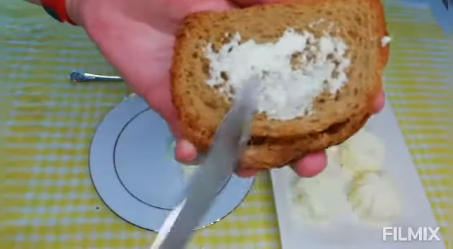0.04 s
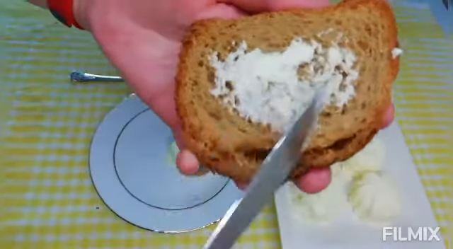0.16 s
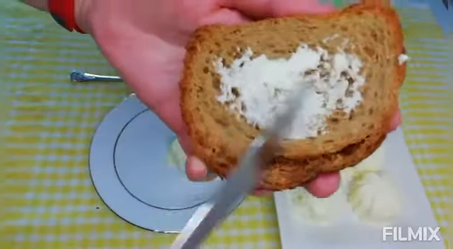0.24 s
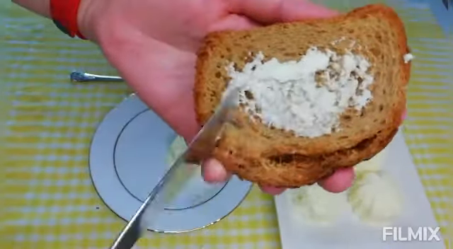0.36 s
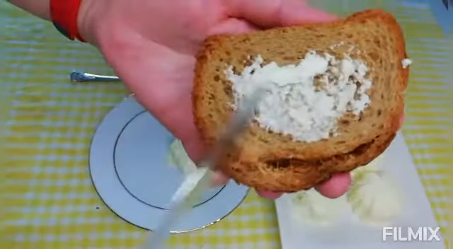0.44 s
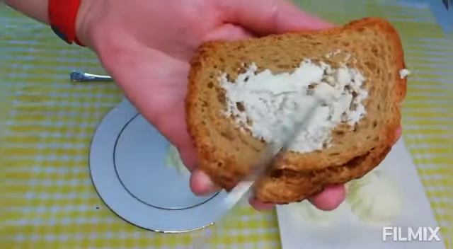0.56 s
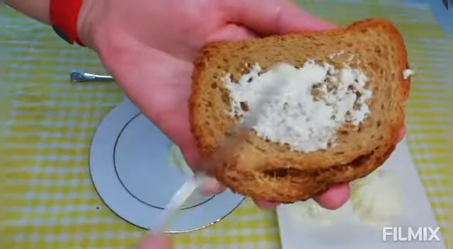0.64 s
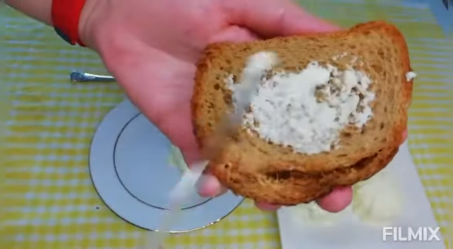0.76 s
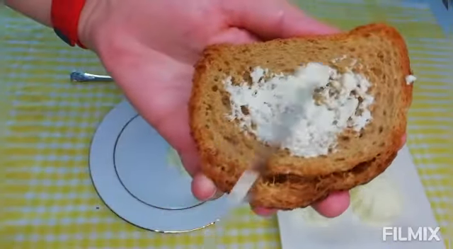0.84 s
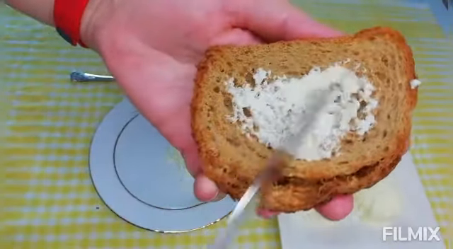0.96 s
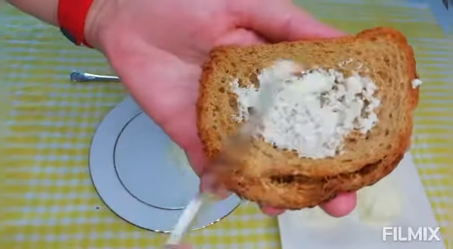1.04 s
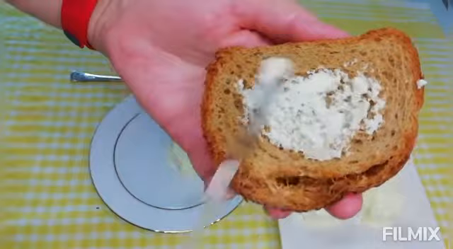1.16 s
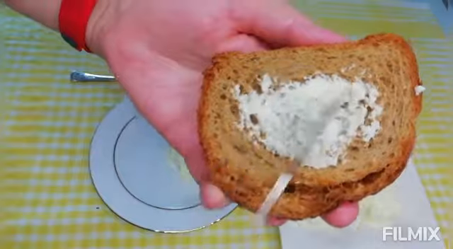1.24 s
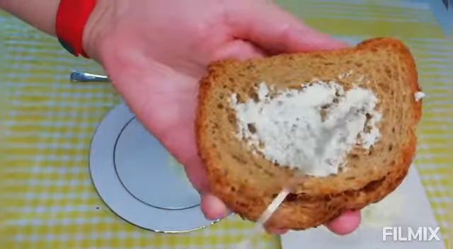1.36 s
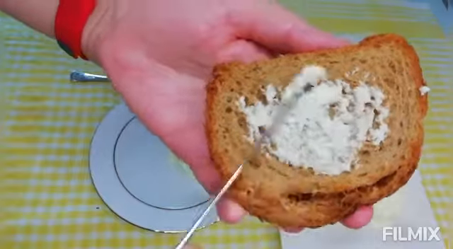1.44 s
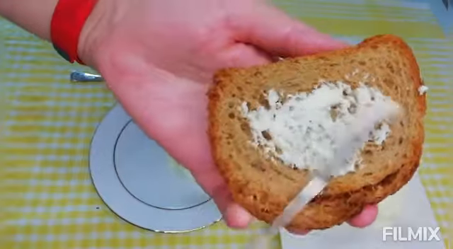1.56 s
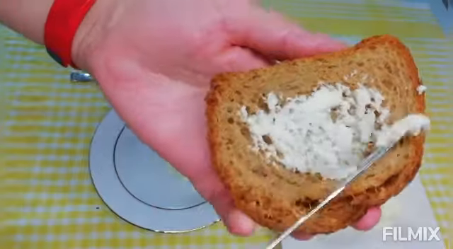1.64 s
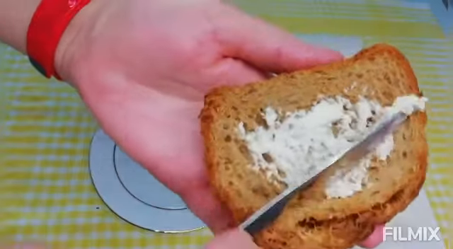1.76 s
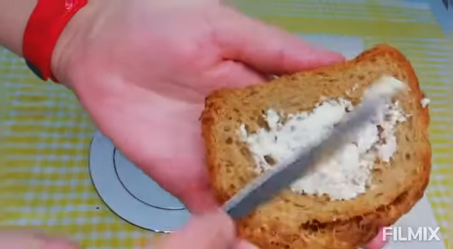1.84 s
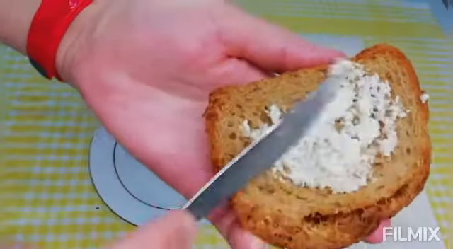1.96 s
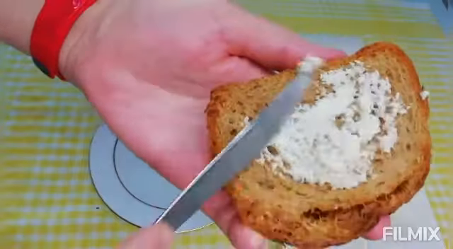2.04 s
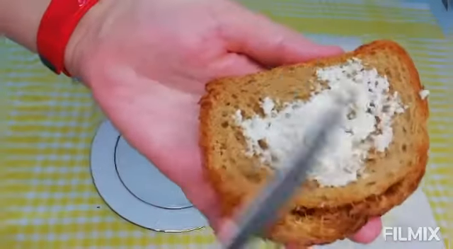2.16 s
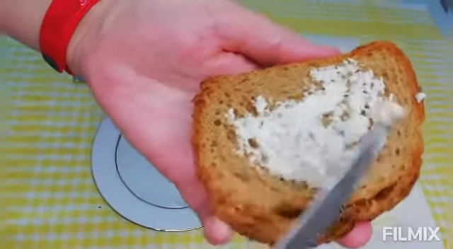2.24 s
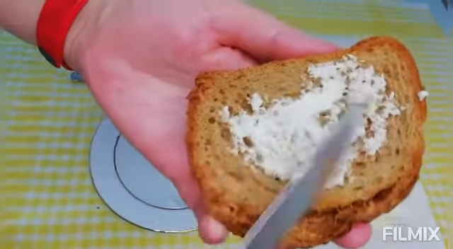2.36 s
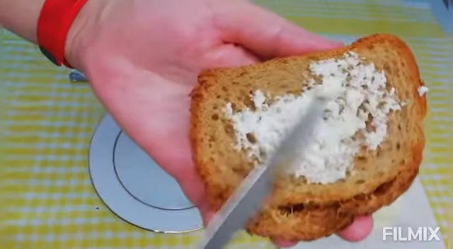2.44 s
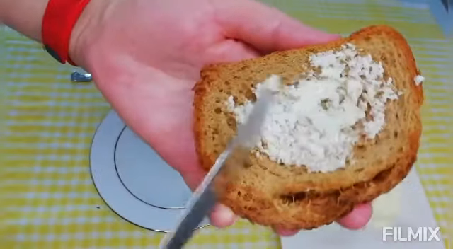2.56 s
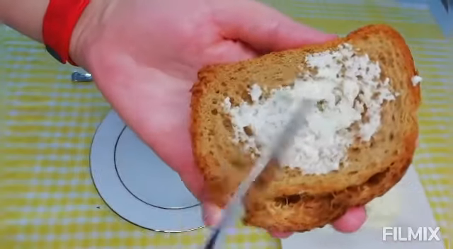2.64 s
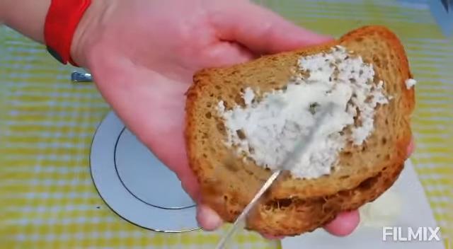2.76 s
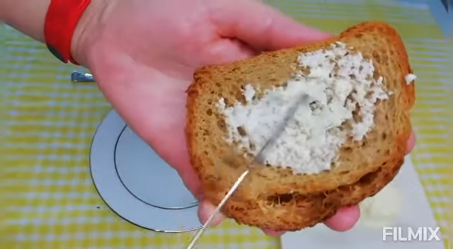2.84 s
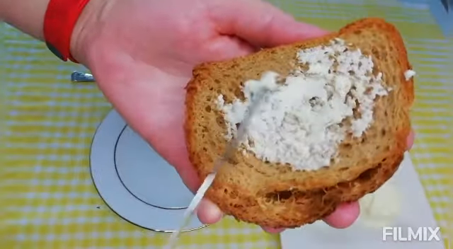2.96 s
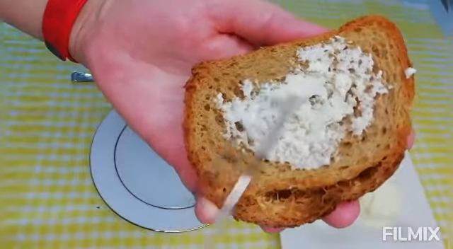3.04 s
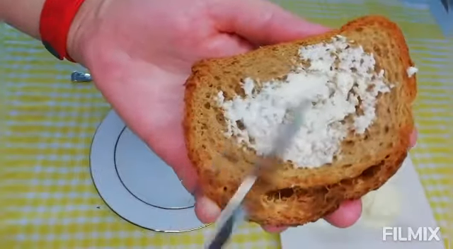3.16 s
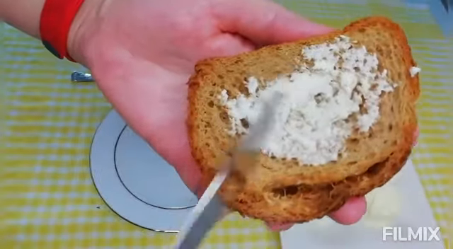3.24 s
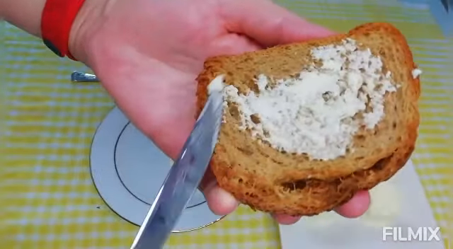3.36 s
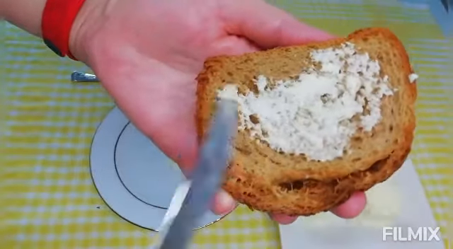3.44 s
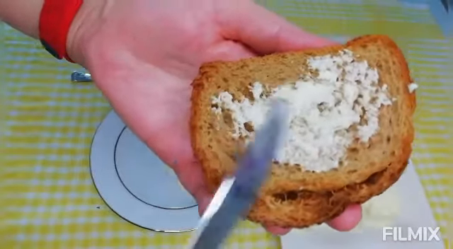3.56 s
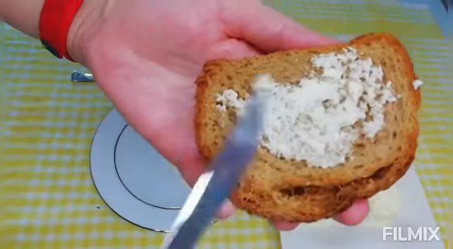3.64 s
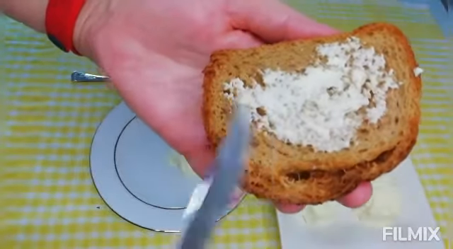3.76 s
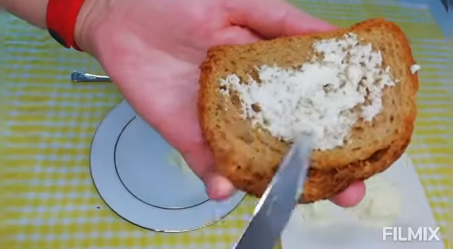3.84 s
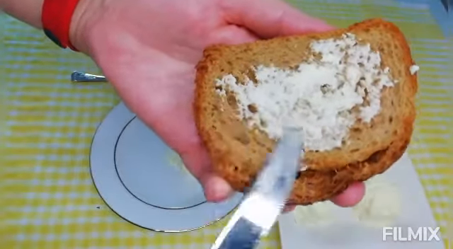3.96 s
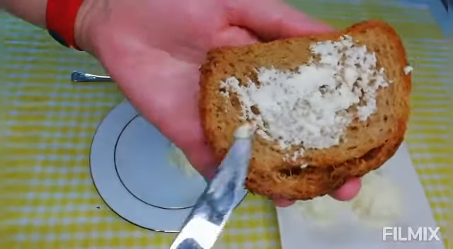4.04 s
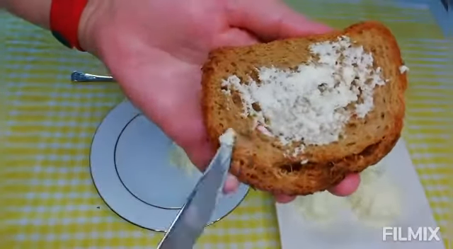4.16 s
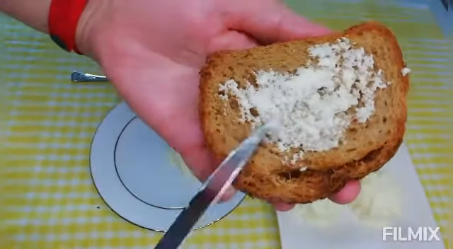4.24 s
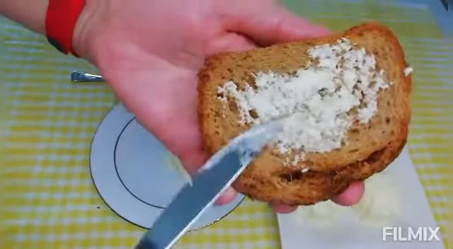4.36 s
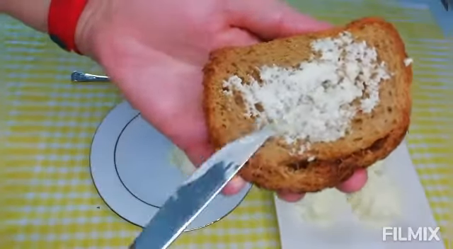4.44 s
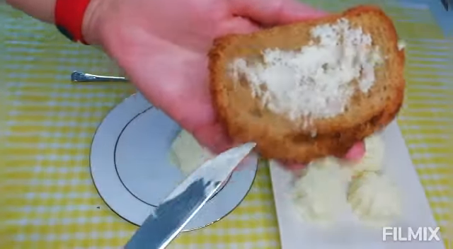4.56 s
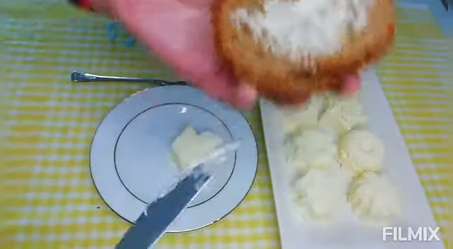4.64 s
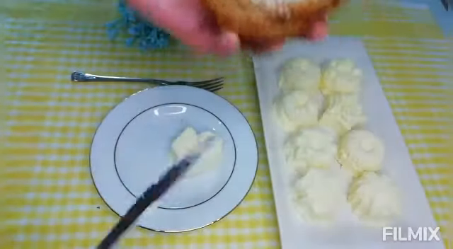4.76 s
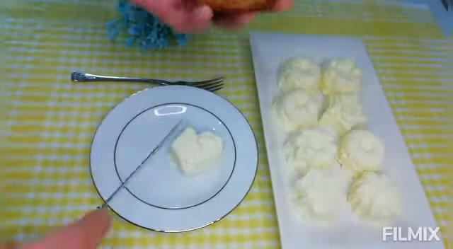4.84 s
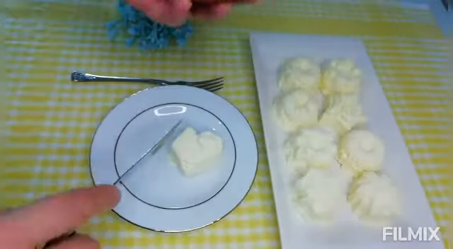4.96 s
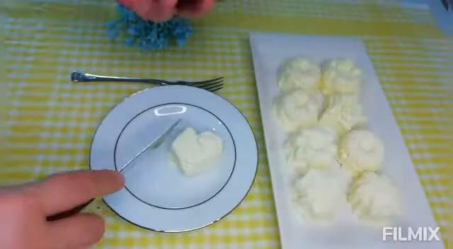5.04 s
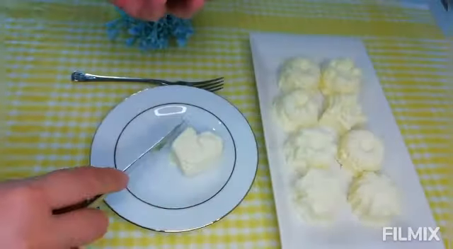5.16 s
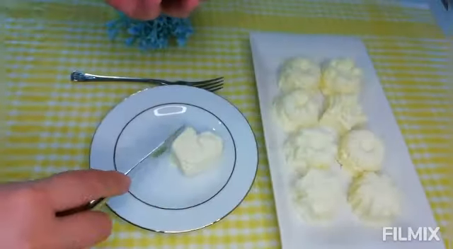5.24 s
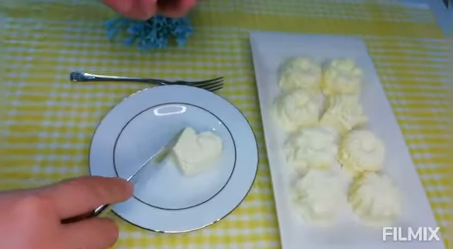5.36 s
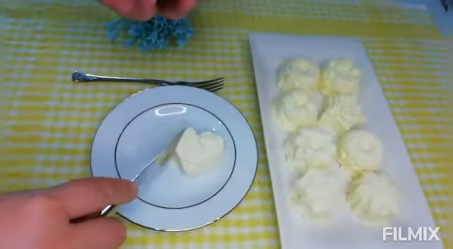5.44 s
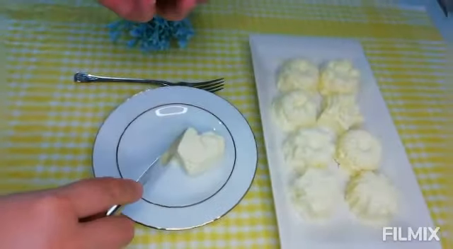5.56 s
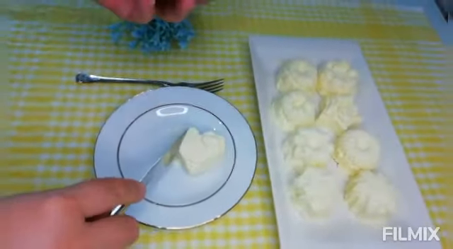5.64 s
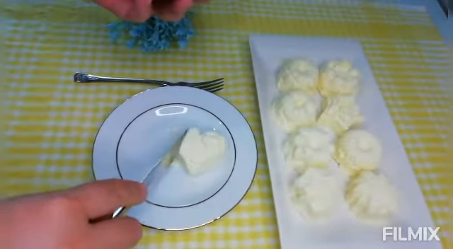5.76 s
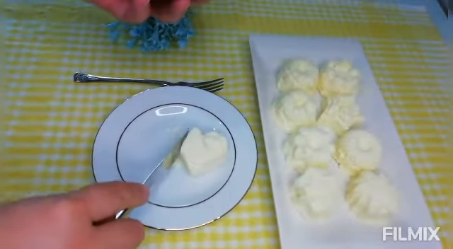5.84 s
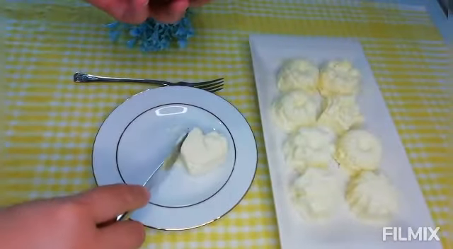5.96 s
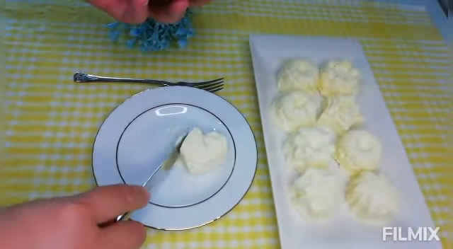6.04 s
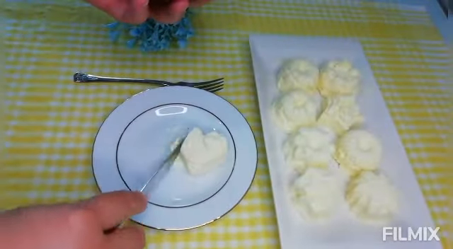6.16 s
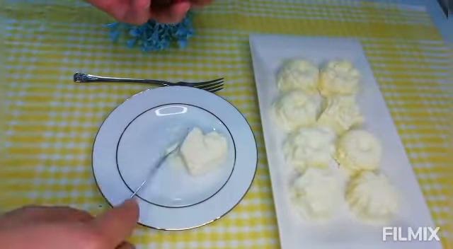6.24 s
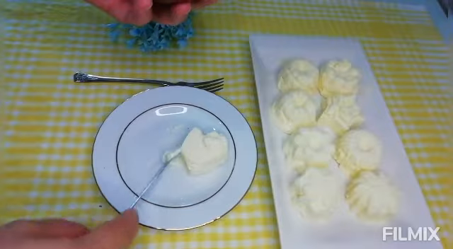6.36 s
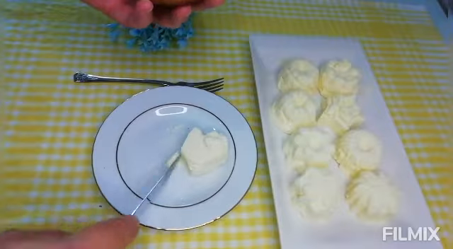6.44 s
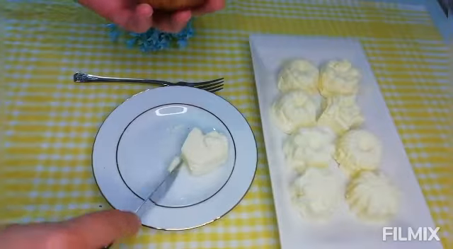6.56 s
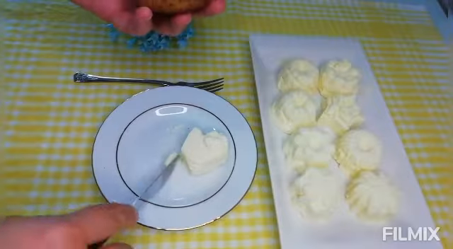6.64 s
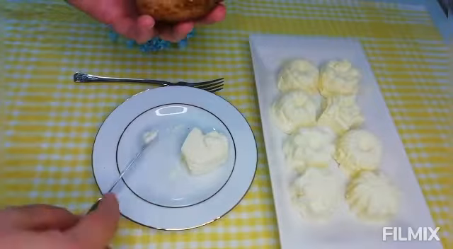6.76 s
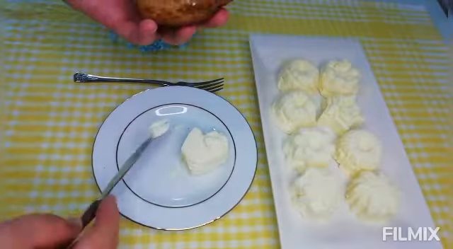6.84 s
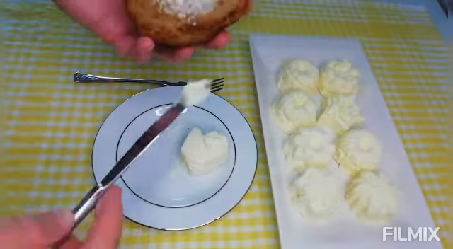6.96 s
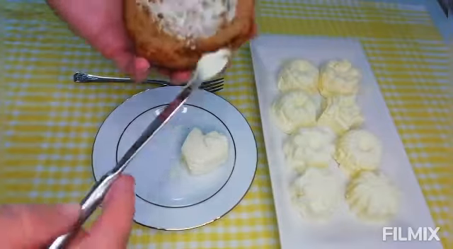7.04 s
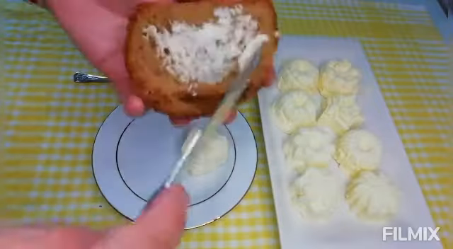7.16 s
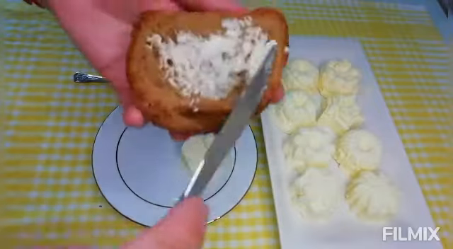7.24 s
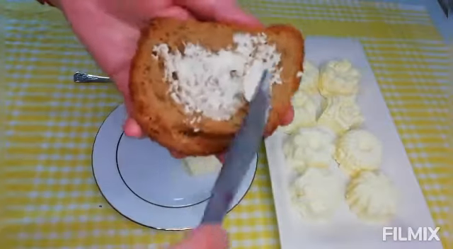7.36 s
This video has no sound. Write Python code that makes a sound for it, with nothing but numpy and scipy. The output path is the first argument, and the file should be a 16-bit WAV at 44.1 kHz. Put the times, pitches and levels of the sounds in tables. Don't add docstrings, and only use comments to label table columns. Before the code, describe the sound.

In a quiet home kitchen, two close microphones pick up a table knife spreading butter on dry toast held in the palm. From 0 to about 3.8 seconds come short, dry, crackling scrapes, mostly under a tenth of a second, often in quick pairs with brief gaps; dense crumb grains are mixed with single sharp snaps, strongest around 0.3 and 1.1 seconds. The slice adds a hollow, papery body and faint dull taps against the hand. Around 4.0 to 4.2 the blade skips on the hard rim with brittle cracks and a stronger palm knock; from 4.4 to 4.6 finer cracks end with a slight metallic ring. Then only low rumble, soft hiss and faint refrigerator hum remain. At 6.15 the blade gives one loud, bright, short-ringing click on the plate, followed by a tiny slide near 6.3 and another at 6.7 to 6.8. Quiet room tone closes it.

```python
import sys
import numpy as np
from scipy import signal
from scipy.fft import rfft, irfft, next_fast_len
from scipy.io import wavfile

SR = 44100
rng = np.random.default_rng(int(sys.argv[2]) if len(sys.argv) > 2 else 0)


def put_to_file(sound):
    columns = np.atleast_2d(sound).T
    safe = np.clip(columns, -1, 1)
    whole_steps = np.round(safe * 32767)
    wavfile.write(sys.argv[1], SR, whole_steps.astype(np.int16))


def field_ratio(decibels):
    return 10 ** (np.asarray(decibels, dtype=float) / 20)


N = 325899
SIZE = next_fast_len(N + SR)
BINS_HZ = np.maximum(np.arange(SIZE // 2 + 1) * SR / SIZE, 1)
CONTROL_STEP = 40

# (frequency [Hz], level [dB per Hz])
RUMBLE_COLOUR = [(15, -27), (30, -0.5), (50, 3), (75, -7), (100, -5.5), (160, -12), (200, -6.5),
                 (320, -17.5), (450, -13), (520, -25.5), (750, -20), (1500, -46)]
# (frequency [Hz], likeness [0 to 1])
RUMBLE_ALIKE = [(60, 1), (130, 1), (290, 0.48), (640, 0.01)]
# (frequency [Hz], left level [dB], right level [dB])
HISS_COLOUR = [(496, 2, 8.5), (1033, 12, 13), (1460, 4.5, 6), (2340, -1.5, 0), (3350, 2, 2), (4820, 1, 2),
               (6030, -3.5, -3), (6700, -1.5, 0), (7300, -4, -0.5), (8100, 2, 6.5), (9470, 3.5, 1.5),
               (9800, -5.5, -7), (12500, -11, -10.5), (15640, -12, -16)]
# (frequency [Hz], level [dB])
FRIDGE_TONES = [(48.5, -70), (97.5, -72), (146, -80), (196, -76), (245, -79), (294, -83), (343.5, -80),
                (451, -82), (834, -87), (3700, -93), (6670, -94), (7354, -93), (7946, -89)]

# (time [s], peak level [dB])
PLATE_BLOWS = [
    (6.1552, 19.5),
]
# (time [s], level [dB])
GLAZE_SLIDES = [
    [(6.24, -58), (6.28, -59), (6.312, -47), (6.37, -90)],
    [(6.68, -87), (6.692, -48.5), (6.698, -57), (6.76, -45.5), (6.82, -91)],
]
# (frequency [Hz], level [dB])
SLIDE_COLOUR = [(2500, -6), (4500, -1), (5600, -7), (6030, 4), (6500, -4), (7500, 4), (8300, -6),
                (10500, -8)]
# (frequency [Hz], left level [dB], right level [dB])
CONTACT_COLOUR = [(1500, -48, -48), (2500, -20, -23), (3300, -20, -23), (3850, -30, -31), (4150, -5, -2),
                  (5050, -4, 0), (5800, -16, -15), (7000, -28, -28), (7300, -4, -5), (8900, -17, -16),
                  (9800, -29, -29), (10500, -16, -18), (11300, -31, -33), (15600, -30, -32)]
# (frequency [Hz], level [dB], time to fall 60 dB [s])
PLATE_TONES = [(190, -70, .12), (240, -69, .14), (750, -66, .02), (2798, -76, .3), (2812, -70, .4),
               (4420, -45, .1), (4506, -59, .15), (6029, -53, .13), (7418, -61, .12), (7849, -63, .15),
               (8226, -61, .15), (8960, -64, .12), (10490, -65, .11), (12960, -72, .06)]

# (time [s], peak level [dB])
PALM_KNOCKS = [
    (0.335, -41),
    (0.69, -42),
    (2.42, -38),
    (2.875, -56),
    (3.983, -39),
    (4.097, -48),
    (4.140, -22.5),
    (4.158, -28.5),
]
# (frequency [Hz], level [dB], time to fall 60 dB [s])
PALM_TONES = [(330, -26, .03), (670, -17, .02), (950, -22, .015)]

# (time [s], length [s],
# crackle at the bite [dB], crackle at the lift [dB], slice body against crackle [dB])
BLADE_DRAGS = [(0.0, 0.062, -32.5, -51, -14), (0.267, 0.059, -47.5, -30.5, -13.5),
               (0.33, 0.097, -28.5, -31.5, -9), (0.618, 0.073, -35.5, -41.5, -13),
               (0.666, 0.096, -30, -39, -7), (1.038, 0.091, -44, -20.5, -10),
               (1.104, 0.072, -23.5, -42, -9.5), (1.438, 0.031, -59, -39.5, -4.5),
               (1.512, 0.0071, -31.5, -54, -12.5), (1.784, 0.23, -61.5, -46.5, -10.5),
               (1.949, 0.15, -38, -34.5, -24), (2.076, 0.057, -38, -32, -11),
               (2.385, 0.1, -37.5, -37.5, -13.5), (2.501, 0.093, -33, -31, -13),
               (2.874, 0.079, -36, -53.5, -3), (2.978, 0.032, -37.5, -52.5, -10),
               (3.254, .12, -42.5, -41, -2.5), (3.379, 0.067, -31, -41, -11),
               (3.721, 0.058, -36, -37.5, -10), (3.981, 0.055, -50.5, -63, -8),
               (4.029, 0.082, -41.5, -38.5, -9.5), (4.136, 0.064, -29, -32.5, -21.5),
               (4.426, 0.1, -50.5, -44, -8), (4.559, 0.055, -33, -40.5, -29)]
# (time [s], peak level [dB], slice body against crack [dB])
BIG_CRACKS = [(0.032, -23, -3), (0.0653, -20, -4), (0.2740, -24.5, -22), (0.318, -23, -27),
              (0.3217, -14, -25), (0.4042, -19, -17), (0.4114, -24, -16), (0.618, -18, -14),
              (0.627, -24, -19), (0.6758, -16, -22), (0.7016, -17, 6), (0.7476, -19.5, -16),
              (1.0592, -19, -13), (1.0942, -14, -14), (1.110, -9, -20), (1.123, -18, -13),
              (1.5138, -20.5, -8.5), (1.8898, -28, -23), (1.9202, -20.5, -12.5), (1.956, -18.5, -20),
              (1.982, -18, -27), (2.112, -23, -8), (2.132, -19.5, -4), (2.5067, -12.5, -8),
              (2.5766, -14.5, -15), (2.88, -14.5, 1.5), (2.975, -33, -16), (3.398, -21, -17),
              (3.6912, -36, -13), (3.721, -36, -24)]
# (time [s], peak level [dB], slice body [dB])
HARD_RIM_CRACKS = [(3.979, -25.5, -15), (4.042, -36, -7.5), (4.074, -27, 1), (4.0950, -4.5, -22),
                   (4.1299, -16, -17), (4.142, -12, -24), (4.1556, -12.5, -11), (4.1655, -15.5, -8),
                   (4.1888, -12, -11), (4.1974, -26, -2), (4.4186, -33.5, 3), (4.4295, -31, 2),
                   (4.4377, -20.5, -12), (4.4467, -34, 8.5), (4.4786, -28, -8), (4.484, -18.5, -19),
                   (4.4997, -26, 4), (4.5086, -21.5, -21), (4.527, -17, -12), (4.5591, -13.5, -26),
                   (4.5616, -16, -38), (4.5796, -12, -39), (4.5926, -16, -11), (4.6005, -23, -13),
                   (4.6145, -24, -26)]
# (frequency [Hz], left level [dB], right level [dB])
TOAST_COLOUR = [(600, -20, -24), (1300, -7, -5), (2200, 1, 2), (2900, -3, -6), (4400, -3, -1),
                (6000, -5, -5), (6500, -3, 0), (7900, -2, 0), (8400, 3, 6), (10200, 3, -3),
                (10900, -8, -13), (12100, -12, -16), (12900, -7, -12), (14200, -15, -20)]
# (frequency [Hz], level [dB], time to fall 60 dB [s])
BLADE_TONES = [(6500, -30, .015), (7300, -30, .012), (8300, -21, .02), (9100, -34, .015),
               (10200, -26, .025), (13000, -28, .013)]


def rms_one(x):
    return x / np.sqrt(np.mean(x ** 2) + 1e-20)


def at_hz(points, hz=BINS_HZ):
    table = np.array(points, float)
    return np.array([np.interp(np.log(hz), np.log(table[:, 0]), c) for c in table[:, 1:].T])


def in_time(spans):
    t = np.arange(N) / SR
    out = np.zeros((len(spans[0][0]) - 1, N))
    out[0] = -200
    for rows in spans:
        s, *columns = np.transpose(rows)
        inside = (t >= s[0]) & (t <= s[-1])
        out[:, inside] = [np.interp(t[inside], s, c) for c in columns]
    return out


def from_slow(curve):
    return np.interp(np.arange(N) / CONTROL_STEP, np.arange(len(curve)), curve)


def drift(rate):
    r = np.exp(-2 * np.pi * rate * CONTROL_STEP / SR)
    noise = rng.standard_normal(N // CONTROL_STEP + 2002)
    slow = signal.lfilter([1], [1, -2 * r, r * r], noise)[2000:]
    return from_slow(rms_one(slow))


def ring(clicks, tones):
    out = 0
    for k, (hz, db, t60) in enumerate(tones):
        r = field_ratio(-60 / (t60 * SR))
        w = 2 * np.pi * hz / SR
        tone = signal.lfilter([0, field_ratio(db) * np.sin(w)], [1, -2 * r * np.cos(w), r * r], clicks + 1e-18)
        out = out + (-1) ** k * tone
    return out


def causal(db):
    cepstrum = irfft(db * np.log(10) / 20, SIZE)
    cepstrum[..., 1:SIZE // 2] *= 2
    cepstrum[..., SIZE // 2 + 1:] = 0
    return np.exp(rfft(cepstrum))


def late(lead_s):
    return np.exp(-2j * np.pi * BINS_HZ * np.array([[0], [lead_s]]))


def grains(per_s, spread_db):
    sizes = field_ratio(spread_db * np.minimum(rng.exponential(1, N), 4)) * rng.choice([-1, 1], N)
    return rms_one(sizes * (rng.random(N) < per_s / SR))


def crumble(clicks, dealt, t60, own, count=8):
    t = np.arange(400) / SR
    shapes = rng.standard_normal((count, 3, len(t))) * field_ratio(-60 * t / t60)
    own = np.clip(own, 0, 1)
    out = 0
    for k, (common, *each) in enumerate(shapes):
        burst = np.sqrt(1 - own) * common + np.sqrt(own) * np.array(each)
        burst = burst / np.sqrt(np.mean(np.sum(burst ** 2, axis=1)))
        chosen = clicks * (dealt % count == k)
        out = out + signal.oaconvolve(chosen[None], burst, axes=1)[:, :N]
    return out


def rumble():
    mid, side = rfft(rng.standard_normal((2, SIZE)))
    alike = np.clip(at_hz(RUMBLE_ALIKE), 0, 1)
    both = np.sqrt(1 + alike) * mid + np.sqrt(1 - alike) * side * [[1], [-1]]
    noise = irfft(both * field_ratio(at_hz(RUMBLE_COLOUR)), SIZE)[:, :N]
    return field_ratio(-65 + 1.0 * drift(9.6)) * rms_one(noise)


def hiss():
    noise = rfft(rng.standard_normal((2, SIZE))) * field_ratio(at_hz(HISS_COLOUR))
    noise = noise * BINS_HZ ** 2 / (BINS_HZ ** 2 + 500 ** 2)
    return field_ratio(-67 + .7 * drift(4.3)) * rms_one(irfft(noise, SIZE)[:, :N])


def refrigerator():
    t = np.arange(N) / SR
    out = np.zeros((2, N))
    for hz, db in FRIDGE_TONES:
        waver = (1.05 + hz / 500) * drift(2.39)
        offset = rng.uniform(0, 7.84, (2, 1)) * min(hz / 600, 1)
        phase = 2 * np.pi * hz * t + waver + offset
        out += np.sqrt(2) * field_ratio(db + 2.5 * drift(2.5)) * np.sin(phase)
    return out


def kitchen_echo(x):
    t60_s, echo_db, dull_hz = .23, -9.0, 12000
    t = np.arange(SR // 2) / SR
    first_walls = np.clip((t - .002) / .005, 0, 1)
    tail = rng.standard_normal((2, len(t))) * field_ratio(-60 * t / t60_s) * first_walls
    tail = tail / np.sqrt(np.mean(np.sum(tail ** 2, axis=1)))
    wet = rfft(x, SIZE) * rfft(tail, SIZE) / (1 + 1j * BINS_HZ / dull_hz)
    return field_ratio(echo_db) * irfft(wet, SIZE)[:, :N]


def plate():
    blow = np.zeros(N)
    for s, peak_db in PLATE_BLOWS:
        blow[round(s * SR)] = field_ratio(peak_db)
    friction = grains(6000, spread_db=2) * field_ratio(2 * drift(40))
    rubbing = field_ratio(in_time(GLAZE_SLIDES)[0] + 9) * friction
    slide = crumble(rubbing, rng.integers(0, 8, N), t60=.001, own=.4)
    touch = blow + irfft(rfft(slide, SIZE) * field_ratio(at_hz(SLIDE_COLOUR)), SIZE)[:, :N]
    hollow = causal(-12.0 * np.exp(-(np.log(BINS_HZ / 1250) / 0.25) ** 2))
    contact = rfft(touch, SIZE) * causal(at_hz(CONTACT_COLOUR))
    ringing = rfft(ring(touch, PLATE_TONES), SIZE) * hollow
    return irfft((contact + ringing) * late(0.0001), SIZE)[:, :N]


def palm_knocks():
    taps = np.zeros(N)
    for s, peak_db in PALM_KNOCKS:
        taps[round(s * SR)] = field_ratio(peak_db)
    soft = signal.lfilter([.12], [1, -.88], taps)
    return ring(soft, PALM_TONES) * field_ratio(np.array([[1.5], [-1.5]]))


def drags():
    bite_db_per_s, lift_db_per_s = 3500, 1100
    s, length, bite_db, lift_db, body_db = np.transpose(BLADE_DRAGS)[..., None]
    since = np.arange(0, N + CONTROL_STEP, CONTROL_STEP) / SR - s
    along = np.clip(since / length, 0, 1)
    level = bite_db + (lift_db - bite_db) * along
    level = level + bite_db_per_s * np.minimum(since, 0) - lift_db_per_s * np.maximum(since - length, 0)
    lead = np.argmax(level, axis=0), np.arange(since.shape[1])
    crust_db = np.maximum(level[lead], -200)
    slice_db = (body_db + 4 * (np.sin(np.pi * along) - .5))[lead]
    finest_db = -22 + 5.5 * along[lead] + 8 * (since[0] > 3.9)
    push_db = -59 + 35 + (0.2 - 1) * (np.maximum(crust_db, -60) + 35)
    pan_db = 6 - 34 * (along * length)[lead]
    return [from_slow(c) for c in (crust_db, slice_db, finest_db, push_db, pan_db)]


def crack_clicks(crust_db, body_db):
    per_s, small_db, spread_db = 140, 4, 2
    sizes = field_ratio(spread_db * np.minimum(rng.standard_normal(N), 1))
    small = (rng.random(N) < per_s / SR) * sizes
    cracks = small * field_ratio(crust_db + small_db + 12)
    crack_body = cracks * field_ratio(body_db + 3.0)
    s, peak_db, crack_body_db = np.transpose(BIG_CRACKS + HARD_RIM_CRACKS)
    at = np.round(s * SR).astype(int)
    cracks[at] = field_ratio(peak_db + 5.0)
    crack_body[at] = field_ratio(peak_db + crack_body_db + 10.5)
    return cracks, crack_body


def blade(snaps):
    free_db = np.where(np.arange(N) / SR > 4.55, 13, 0)
    return ring(snaps * field_ratio(free_db), BLADE_TONES)


def toast():
    crust_db, body_db, finest_db, push_db, pan_db = drags()
    patch = np.repeat(rng.integers(0, 8, N // 1000 + 1), 1000)[:N]
    dealt = np.where(rng.random(N) < .8, patch, rng.integers(0, 8, N))
    clumps = field_ratio(4 * np.minimum(drift(70), 1.2))
    uneven_db = 2.5 * np.minimum(drift(45), .8)
    stroke = field_ratio(crust_db - 2.0 + uneven_db) * grains(4500 * clumps, spread_db=4.3)
    cracks, crack_body = crack_clicks(crust_db, body_db)

    snaps = crumble(cracks, dealt, t60=.011, own=.4)
    crust = crumble(stroke, dealt, t60=.004, own=.4) + snaps
    body = crumble(stroke * field_ratio(body_db + 10.5), dealt, t60=.012, own=.35)
    body = body + crumble(crack_body, dealt, t60=.022, own=.2)

    below_crust = 1 / (1 + (BINS_HZ / 3100) ** 8) / (1 + (600 / BINS_HZ) ** 4)
    below_top = 1 / (1 + (BINS_HZ / 11000) ** 16)
    free_body = rfft(body * field_ratio(3 + .8 * (body_db - 5)), SIZE)
    sound = rfft(body, SIZE) * np.sqrt(below_crust)
    sound = sound + free_body * np.exp(-((BINS_HZ - 2250) / 300) ** 2)
    sound += rfft(crust, SIZE) * np.sqrt((1 - below_crust) * below_top)
    sound += rfft(crust * field_ratio(finest_db + 15.5), SIZE) * np.sqrt(1 - below_top)
    sound = sound * causal(at_hz(TOAST_COLOUR)) + rfft(blade(snaps), SIZE) * field_ratio(-9)
    sound = sound * late(0.00013)

    hand_band = signal.butter(2, [220, 800], "band", fs=SR, output="sos")
    push = signal.sosfilt(hand_band, crust * field_ratio(push_db + 2.5))
    side = field_ratio((pan_db - 2) * np.array([[.5], [-.5]]))
    return (irfft(sound, SIZE)[:, :N] + push) * side


def scene():
    quiet = rumble() + hiss() + refrigerator()
    table = plate()
    held = toast() + palm_knocks()
    return quiet + kitchen_echo(field_ratio(-2.0) * held + table) + table + held


def roll_off(x):
    return signal.sosfilt(signal.butter(12, 16670, fs=SR, output="sos"), x)


def record(dry):
    steep = signal.cheby2(12, 60, 16400, fs=SR, output="sos")
    return roll_off(signal.sosfilt(steep, dry))


dry = scene()
out = record(dry)
put_to_file(out)
```